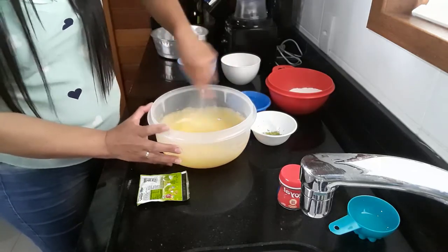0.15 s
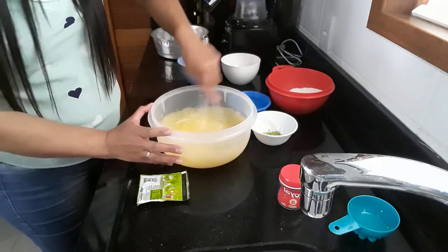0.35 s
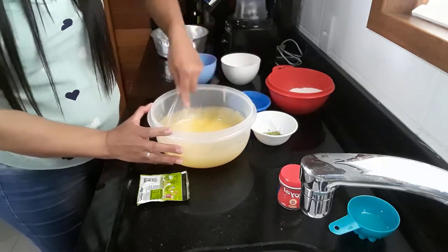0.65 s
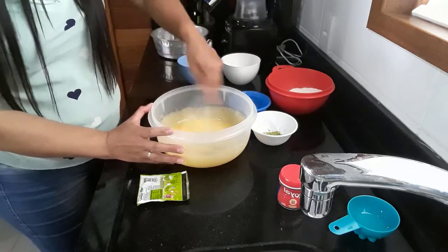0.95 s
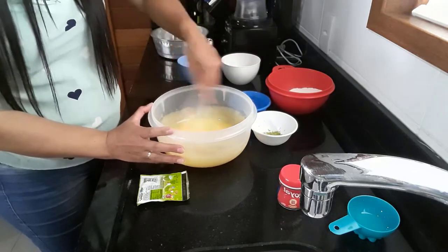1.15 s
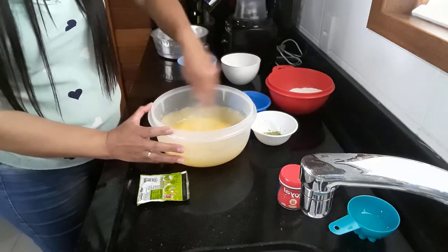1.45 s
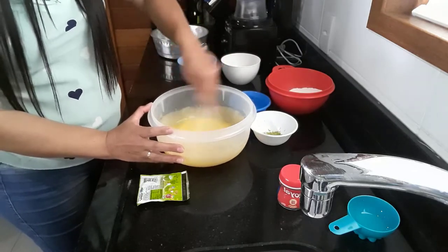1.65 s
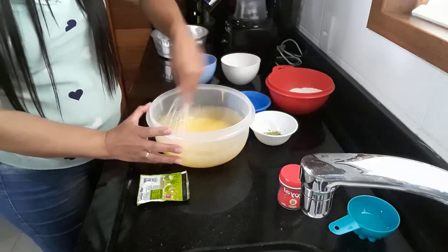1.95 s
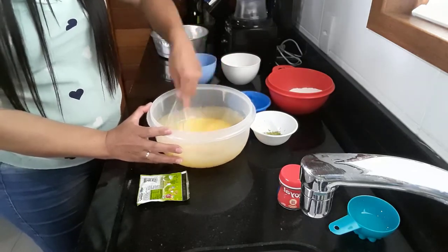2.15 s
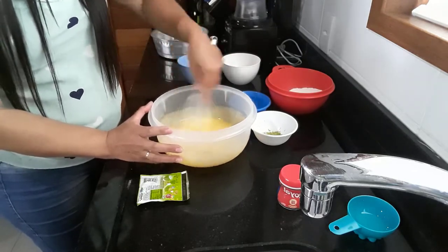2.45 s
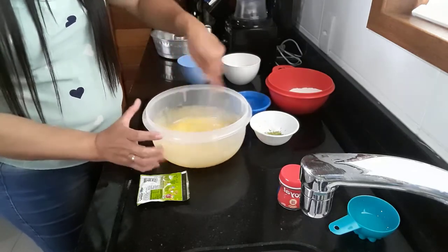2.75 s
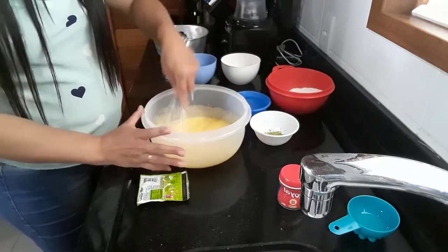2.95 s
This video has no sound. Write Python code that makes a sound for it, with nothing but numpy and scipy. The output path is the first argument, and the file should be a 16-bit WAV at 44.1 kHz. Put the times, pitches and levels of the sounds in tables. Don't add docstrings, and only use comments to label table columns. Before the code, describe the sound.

A wire whisk beats thin batter in a plastic bowl for about three seconds. From 0.15 s, low hollow thuds on the near wall alternate with brighter clicking clatters on the far wall, roughly every 0.1 s, with faint scrapes between. Blows strengthen from about 0.8 to 2.4 s, then loosen, with a rattling hit near 2.6 and a brisk cluster around 2.85. Short hard-room reflections, wavering low fridge hum.

```python
import sys
import numpy as np
from scipy import signal
from scipy.fft import rfft, irfft
from scipy.io import wavfile
from scipy.ndimage import uniform_filter1d

SR = 44100
rng = np.random.default_rng(int(sys.argv[2]) if len(sys.argv) > 2 else 0)


def waveform_to_disk(signal):
    frames = np.transpose(np.atleast_2d(signal))
    scaled = np.clip(frames, -1, 1) * 32767
    samples = np.round(scaled).astype(np.int16)
    wavfile.write(sys.argv[1], SR, samples)


def attenuation_scalar(level_db):
    decades = np.asarray(level_db, float) / 20
    return 10 ** decades


N = 136710


def colour(x, points):
    hz, db = np.transpose(points)
    grid_hz = np.maximum(np.arange(2049) * SR / 4096, 1)
    log_gain = np.interp(np.log(grid_hz), np.log(hz), db) * np.log(10) / 20
    cepstrum = irfft(log_gain)
    cepstrum[1:2048] *= 2
    cepstrum[2049:] = 0
    impulse = irfft(np.exp(rfft(cepstrum)))
    return signal.fftconvolve(x, impulse)[:len(x)]


def rms_one(x):
    return x / np.sqrt(np.mean(x ** 2) + 1e-20)


def ring(clicks, hz, t60_s):
    decay = attenuation_scalar(-60 / (t60_s * SR))
    turn = 2 * np.pi * hz / SR
    return signal.lfilter([0, np.sin(turn)], [1, -2 * decay * np.cos(turn), decay ** 2], clicks + 1e-18)


def train(start_s, size):
    index = np.clip(start_s * SR, 0, N - 1).astype(int)
    return np.bincount(index.ravel(), size.ravel(), N)


# pitch_hz, level_db (per Hz)
AIR = [(30, 10.5), (76, -12), (234, -13), (400, -21), (1200, -17), (3000, -20), (9000, -23.5), (16000, -44)]
# start_s, level_db
HUM = [(0.0, -62), (0.36, -60), (0.42, -49), (1.0, -52), (1.08, -46), (1.22, -53), (1.84, -57), (1.89, -50),
       (2.25, -54), (2.36, -50), (2.64, -48), (2.72, -79), (2.869, -40.5), (3.1, -51)]


def fridge():
    hum_hz, trim_db, wobble_db, drift = 117.3, -2, 5, 14.1
    t = np.arange(N) / SR
    wobble = np.interp(np.arange(N), np.arange(70) * N / 69, rng.standard_normal(70))
    level_db = np.interp(t, *np.transpose(HUM)) + trim_db + wobble_db * wobble
    phase = 2 * np.pi * hum_hz * t + drift * np.cumsum(wobble) / SR + wobble
    air = colour(rng.standard_normal(N + 4096), AIR)[4096:]
    return attenuation_scalar(-42) * rms_one(air) + attenuation_scalar(level_db) * np.sin(phase)


def kitchen(x):
    places, place_s, gap_s = 5, 0.015, 0.0037
    low_t60_s, top_t60_s = 0.38, 0.21
    t = np.arange(SR // 2) / SR
    place = (np.arange(N) / SR / place_s).astype(int) % places
    out = 0
    for k in range(places):
        white = rng.standard_normal(SR // 2) * np.clip(t / gap_s - 1, 0, 1)
        low = signal.sosfilt(signal.butter(1, 2500, fs=SR, output="sos"), white)
        tail = low * attenuation_scalar(-60 * t / low_t60_s) + (white - low) * attenuation_scalar(-60 * t / top_t60_s)
        tail = tail / np.sqrt(np.sum(tail ** 2))
        share = uniform_filter1d(1. * (place == k), size=200)
        out = out + signal.fftconvolve(x * share, tail)[:N]
    return out


def body(modes, s, db, favour_hz, rub):
    favour_db, favour_oct, spread_db, later_share = 8.5, 0.13, 0.5, 0.69
    luck = rng.standard_normal((len(db), len(modes)))
    later = rng.integers(1, s.shape[1], (len(db), len(modes), 2))
    out = 0
    for k, (hz, mode_db, t60_s) in enumerate(modes):
        near_db = favour_db * np.exp(-(np.log2(hz / favour_hz) / favour_oct) ** 2)
        when = np.c_[s[:, 0], np.take_along_axis(s, later[:, k], axis=1)]
        size = attenuation_scalar(db + near_db + spread_db * luck[:, k])[:, None] * later_share ** np.arange(3)
        out = out + attenuation_scalar(mode_db) * (-1) ** k * ring(train(when, size) + rub, hz, t60_s)
    return out


# start_s, end_s, level_db
DRAGS = [(0., 0.003, -26), (0.177, 0.233, -35.5), (0.392, 0.488, -32), (0.625, 0.705, -30),
         (0.84, 0.869, -30.5), (1.04, 1.092, -30), (1.24, 1.252, -30), (1.26, 1.314, -29.5),
         (1.464, 1.534, -30), (1.678, 1.75, -28.5), (1.869, 1.944, -27.5), (2.104, 2.172, -26),
         (2.296, 2.432, -32), (2.514, 2.698, -35), (2.847, 2.955, -29)]


def drag():
    slips_per_s, spread_db, edge_s = 1200, 3.5, 0.012
    t = np.arange(N) / SR
    stroke = 0
    for start_s, end_s, db in DRAGS:
        times = [start_s - edge_s, start_s, end_s, end_s + edge_s]
        stroke = stroke + attenuation_scalar(db) * np.interp(t, times, [0, 1, 1, 0])
    chance, strength, side = rng.random((3, N))
    slips = (chance < slips_per_s / SR) * attenuation_scalar(-spread_db * np.log(strength + 0.0057))
    return stroke * rms_one(slips * np.sign(side - 0.5))


# pitch_hz, level_db, t60_s
BOOM = [(216.6, -2.5, 0.081), (333.7, -4.5, 0.13), (385, 3.5, 0.034), (445, 0, 0.064), (494, 1, 0.03),
        (570, 0, 0.047), (667.4, -4, 0.085), (754, -7.5, 0.027)]
# start_s, level_db, favoured_hz, push_ms
BOOMS = [(0.009, -29.5, 574, 8.64), (0.15, -21, 358, 7.7), (0.177, -24.5, 423, 7.7),
         (0.383, -15.5, 376, 8.04), (0.414, -25.5, 644, 7.45), (0.611, -14, 416, 8.8),
         (0.823, -15.5, 457, 7.47), (1.036, -15, 482, 9.6), (1.249, -14.5, 540, 7.54),
         (1.457, -18, 647, 7.55), (1.484, -24, 332, 7.94), (1.544, -21.5, 423, 7.4), (1.675, -19, 463, 8.6),
         (1.867, -25, 220, 8.3), (1.879, -19.5, 437, 8.2), (2.087, -18.5, 221, 7.62), (2.171, -31, 480, 8),
         (2.288, -26, 474, 8.8), (2.316, -17.5, 583, 12), (2.505, -24.5, 563, 4.54),
         (2.844, -24.5, 574, 6.9)]


def bowl_boom(rub):
    start_s, db, favour_hz, push_ms = np.transpose(BOOMS)
    shoves_s = start_s[:, None] + push_ms[:, None] / 1000 * [0, 0.5, 1, 1.5]
    boom = body(BOOM, shoves_s, db - 11, favour_hz, attenuation_scalar(-36.5) * rub)
    return signal.sosfilt(signal.butter(2, [160, 930], "band", fs=SR, output="sos"), boom)


# start_s, level_db, pitch_hz, hold_ms
KNOCKS = [(0.151, -23, 445, 16), (0.384, -22, 379, 8.8), (0.409, -24, 643, 20), (0.611, -16.5, 452, 10.6),
          (0.827, -11.5, 468, 15), (1.04, -16.5, 495, 12.2), (1.068, -27, 545, 9.4), (1.25, -12.5, 475, 12),
          (1.46, -16, 406, 26), (1.467, -12.5, 435, 18.4), (1.548, -20.5, 428, 16), (1.675, -15.5, 451, 13),
          (1.863, -24, 496, 11), (1.887, -30, 453, 19), (2.087, -31, 640, 14), (2.103, -18.5, 480, 12),
          (2.179, -23, 503, 13), (2.314, -14.5, 510, 9.9), (2.508, -23.5, 454, 15), (2.561, -28, 560, 13)]
# start_s, level_db, pitch_hz, hold_ms
RIM_PING = (2.705, -40, 1200, 72)


def knocks():
    rise_s, choke_t60_s = 0.0016, 0.023
    out = np.zeros(N + SR)
    t = np.arange(SR // 5) / SR
    for start_s, db, hz, hold_ms in [*KNOCKS, RIM_PING]:
        choked = np.maximum(t - hold_ms / 1000, 0)
        shape = (1 - np.exp(-t / rise_s)) * attenuation_scalar(-60 * choked / choke_t60_s)
        out[int(start_s * SR):][:len(t)] += attenuation_scalar(db - 4.5) * shape * np.sin(2 * np.pi * hz * t)
    return out[:N]


# start_s, level_db, pitch_hz
STRIKES = [(0.1525, -19, 2380), (0.2037, -25, 1160), (0.249, -18, 2600), (0.2572, -12, 1730),
           (0.383, -21, 940), (0.419, -25, 1150), (0.47, -32, 3200), (0.4689, -15.5, 1110),
           (0.611, -27, 1490), (0.6164, -26, 1180), (0.6794, -24.5, 2350), (0.6852, -11, 2390),
           (0.8247, -21, 2680), (0.8312, -13.5, 1160), (0.891, -26, 920), (0.899, -16, 1800),
           (1.0385, -18, 1706), (1.0474, -20, 1860), (1.1008, -12.5, 2320), (1.1074, -13, 2010),
           (1.2555, -31, 960), (1.2556, -9, 1158), (1.3102, -14, 2180), (1.3154, -10, 2430),
           (1.4595, -11, 1610), (1.4654, -10, 1250), (1.5299, -10.5, 2070), (1.6791, -16.5, 1650),
           (1.71, -18.5, 1650), (1.732, -5, 2090), (1.7474, -13, 2070), (1.872, -12, 1700),
           (1.881, -16, 1155), (1.952, -14, 2160), (1.9726, -13, 2400), (2.0884, -2.5, 1716),
           (2.1014, -8.5, 1172), (2.173, -14, 2370), (2.2998, -17.5, 1026), (2.3174, -17, 1126),
           (2.3875, -12, 2240), (2.5074, -16.5, 1060), (2.53, -24, 2530), (2.5641, -17, 2530),
           (2.5755, -16, 2510), (2.617, -9, 1970), (2.621, -13, 1182), (2.8263, -15, 1580),
           (2.83, -7, 1760), (2.848, -6.5, 1740), (2.8702, -10, 1890), (2.8864, -20, 1660)]


def strikes():
    cycles = 52.2
    out = np.zeros(N + SR)
    t = np.arange(SR // 10) / SR
    for start_s, db, hz in STRIKES:
        fading = attenuation_scalar(db - 7 - 60 * t * hz / cycles)
        out[int(start_s * SR):][:len(t)] += fading * np.sin(2 * np.pi * hz * t)
    return out[:N]


def strike_ticks():
    start_s, db, _ = np.transpose(STRIKES)
    return train(start_s, attenuation_scalar(db - 8))


def loops(start_s, spread_ms):
    count, scatter_db, fade_db, rise_db, rise_share = 28, 0.5, 16, 7.5, 0.32
    place = np.sort(rng.random((len(start_s), count)), axis=1)
    place = place - place[:, :1]
    luck, side = rng.standard_normal((2, len(start_s), count))
    size_db = scatter_db * luck - fade_db * place - rise_db * np.exp(-place / rise_share)
    size = attenuation_scalar(size_db) * np.sign(side)
    size = size / np.sqrt(np.sum(size ** 2, axis=1, keepdims=True))
    return start_s[:, None] + place * spread_ms[:, None] / 1000, size


def wire_ticks(s, size):
    crack_s, half_width_oct = 0.00068, 0.78
    tints_hz = np.geomspace(1200, 11000, 6)
    dealt = rng.integers(0, len(tints_hz), s.shape)
    out = 0
    for k, hz in enumerate(tints_hz):
        envelope = signal.lfilter([1], [1, -np.exp(-1 / SR / crack_s)], train(s, size * (dealt == k)))
        spit = envelope * rng.standard_normal(N)
        edges_hz = [hz * 2 ** -half_width_oct, hz * 2 ** half_width_oct]
        band = signal.butter(1, edges_hz, "band", fs=SR, output="sos")
        out = out + attenuation_scalar(0.5) * spit + 2 * signal.sosfilt(band, spit)
    return out


# start_s, click_db, wall_ring_db, favoured_hz, spread_ms
THUDS = [(0.1504, -18.5, -28, 2600, 14.2), (0.383, -15, -24.5, 1280, 13), (0.611, -14.5, -34, 1250, 15.3),
         (0.8238, -9.5, -28, 1210, 12.8), (1.0373, -11, -21.5, 1700, 15), (1.248, -8.5, -25.5, 1200, 12.6),
         (1.4598, -4.5, -30, 1270, 15.2), (1.6748, -11, -29.5, 1620, 17.5), (1.871, -3.5, -23, 1190, 14.2),
         (2.0853, -1.5, -17, 1740, 16.2), (2.2907, -19.5, -23, 1060, 11), (2.3154, -7.5, -27, 1060, 13.8),
         (2.5045, -18, -43, 1060, 13), (2.826, -7.5, -14.5, 2140, 11)]
# start_s, click_db, wall_ring_db, favoured_hz, spread_ms
CLATTERS = [(0.0094, -32, -29.5, 1180, 17.1), (0.2441, -5, -30, 1710, 19.9),
            (0.4590, -9, -21.5, 1110, 16.1), (0.6786, -9, -24.5, 2250, 15.1),
            (0.8911, -4.5, -30, 1780, 17.9), (1.0979, -3.5, -28, 2280, 16.6), (1.3086, -4, -22.5, 2060, 16),
            (1.528, -5.5, -32, 2210, 11.9), (1.7306, -5, -26.5, 2100, 14.2), (1.945, -5, -32, 2240, 19),
            (2.1718, -7, -22, 2240, 14), (2.3855, -7, -28, 2240, 13.3), (2.5588, -11, -23, 2630, 8.9),
            (2.606, -6.5, -33, 1970, 30), (2.8853, -14, -22, 1880, 15.6), (2.9808, -14.5, -33, 1940, 16.7)]
# start_s, level_db
TOUCHES = [(.116, -54), (.238, -28.5), (1.235, -33), (1.448, -28), (1.974, -24), (2.421, -42), (2.653, -30),
           (2.839, -23), (2.860, -28), (2.552, -28.5), (0.2, -36)]
# pitch_hz, level_db, t60_s
WALL = [(1060, -16, 0.015), (1180, -0.5, 0.058), (1348, -3, 0.025), (1678, -0.5, 0.054), (1706, -2, 0.055),
        (1808, 0, 0.037), (2077, -3, 0.03), (2240, 0.5, 0.037), (2430, 0.5, 0.049), (2700, 4, 0.011),
        (3080, -21, 0.054), (3330, -5.5, 0.0058), (4450, -7.5, 0.17)]
# pitch_hz, level_db (per Hz)
CLICK = [(150, -59.5), (300, -5.5), (700, 3), (1500, -0.5), (3000, 0), (6000, -3), (9000, 2), (16000, -23)]


def whisk(rub):
    stray = [(start_s, db, db - 2.5, 1800, 3.0) for start_s, db in TOUCHES]
    blows = np.transpose([*THUDS, *CLATTERS, *stray])
    start_s, click_db, wall_db, favour_hz, spread_ms = blows
    s, size = loops(start_s, spread_ms)
    ticks = wire_ticks(s, np.abs(size) * attenuation_scalar(click_db - 3.5)[:, None])
    clicks = colour(ticks + rub + strike_ticks(), CLICK)
    wall = body(WALL, s, wall_db - 9, favour_hz, attenuation_scalar(-37.5) * rub)
    return clicks, wall


def scene():
    rub = drag()
    clicks, wall = whisk(rub)
    wall = wall + strikes()
    boom, knock = bowl_boom(rub), knocks()
    send = clicks + attenuation_scalar(-8) * wall + attenuation_scalar(-5) * boom + attenuation_scalar(-12) * knock
    direct = clicks + wall + boom + knock
    return (direct + attenuation_scalar(-1.5) * kitchen(send) + fridge())[None]


# pitch_hz, level_db
MIC = [(40, -34), (100, 5.5), (200, 1), (8400, 1.5), (9200, -8), (10300, -13), (12500, 0), (15000, 13.5)]


def microphone(x):
    ceiling, top_hz = 0.53, 16270
    rounded = ceiling * np.tanh(colour(x, MIC) / ceiling)
    return signal.sosfilt(signal.cheby2(10, 45, top_hz, fs=SR, output="sos"), rounded)


def low_pass(x):
    return signal.sosfilt(signal.butter(12, 16820, fs=SR, output="sos"), x)


def record(dry):
    mix = microphone(dry[0])[None]
    return low_pass(mix)


dry = scene()
out = record(dry)
waveform_to_disk(out)
```